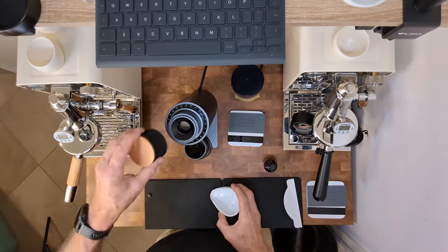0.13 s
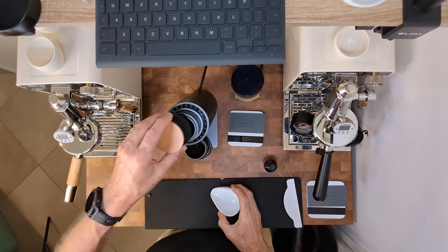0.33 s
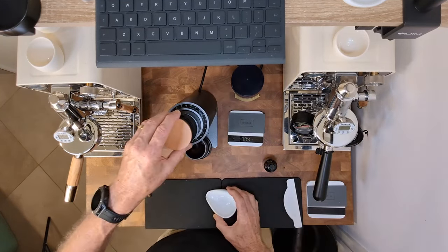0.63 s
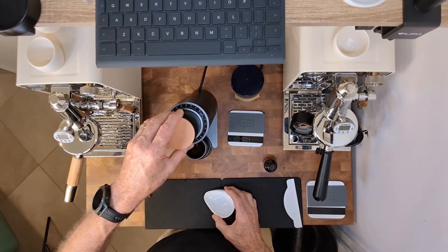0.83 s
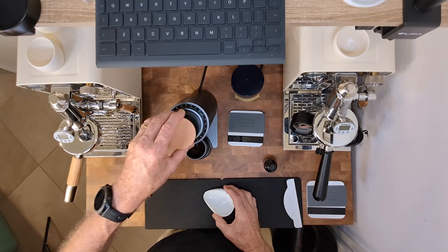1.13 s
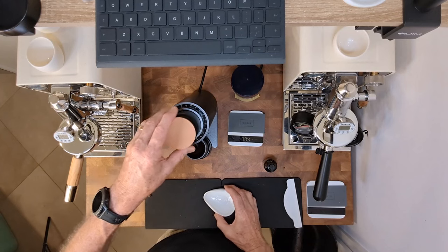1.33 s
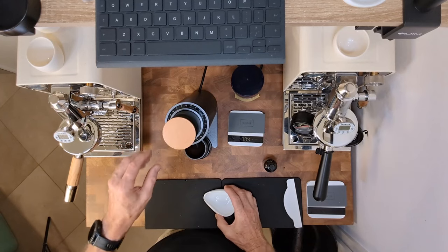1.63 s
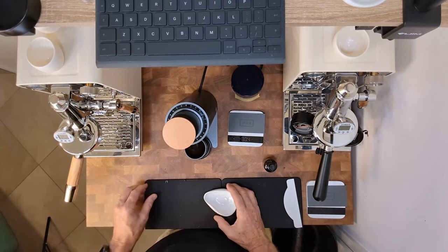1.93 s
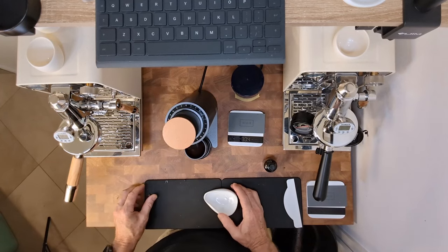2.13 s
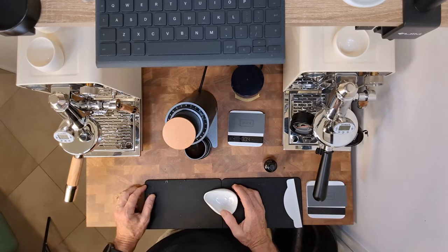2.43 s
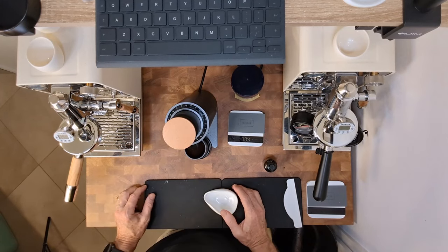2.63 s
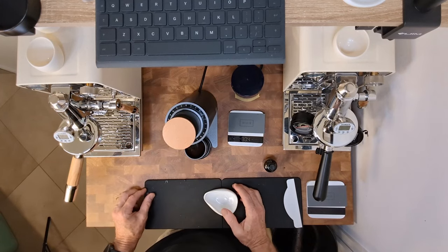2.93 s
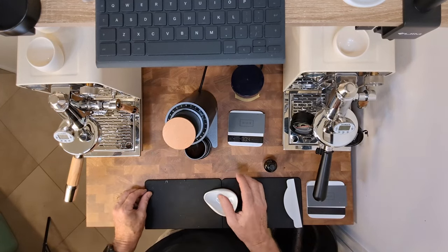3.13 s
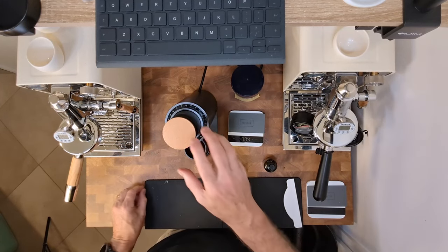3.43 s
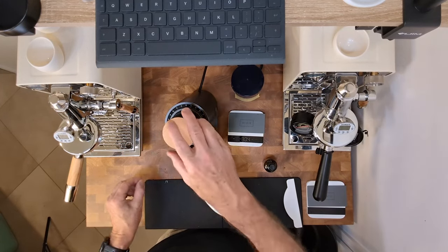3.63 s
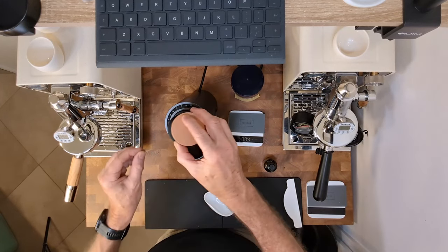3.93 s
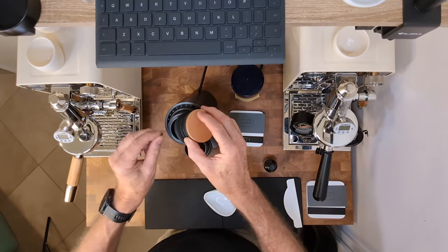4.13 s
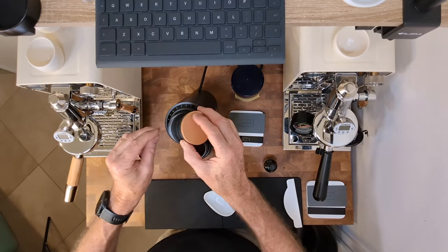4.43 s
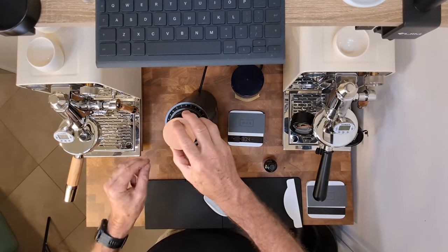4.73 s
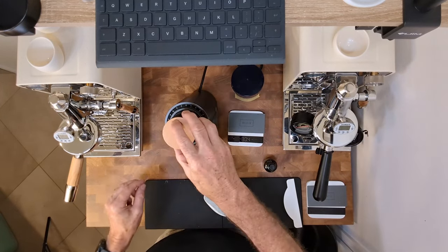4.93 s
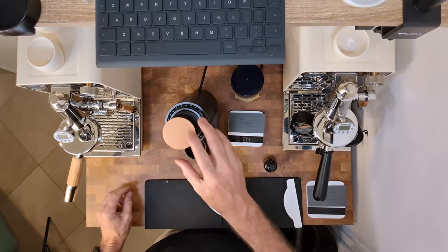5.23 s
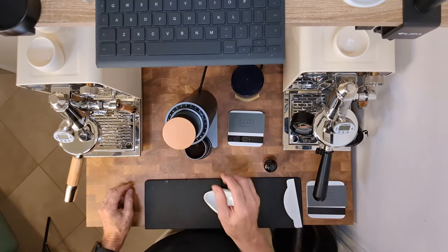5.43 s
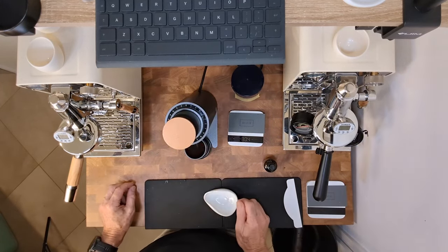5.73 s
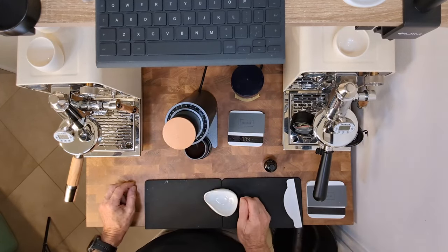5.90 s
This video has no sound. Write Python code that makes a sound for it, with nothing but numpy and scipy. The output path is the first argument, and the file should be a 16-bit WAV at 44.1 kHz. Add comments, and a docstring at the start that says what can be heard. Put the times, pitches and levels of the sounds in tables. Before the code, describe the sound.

Close microphone on a burr grinder crushing roasted beans on a counter, with short room reflections. Continuous rough grinding and a jolting mid-pitched whine run throughout, dipping as beans catch and crack. The open hopper rings hollow with spraying fragments at the start, is covered, then opens again about two thirds through with a tiny high ping before closing. The grinding carries on unbroken to the end.

```python
"""A whining motor and rasping burrs are heard at once: an electric grinder chews roasted beans, close by.
Its hopper starts half open; a hand sets the lid on, later lifts it and puts it back.
While it is open, ringing air and spraying fragments make the grinding hollower and brighter.
Each bean the burrs catch cracks, rings the chamber and drags down the whine of the gears.
Random tiny breaks shake the housing, a motor hums low down, and one thin ping rings near the end."""
import sys
import numpy as np
from scipy import signal
from scipy.fft import rfft, irfft
from scipy.io import wavfile

SR = 44100
rng = np.random.default_rng(int(sys.argv[2]) if len(sys.argv) > 2 else 0)


def store_pcm(level_fs):
    """Save levels as 16-bit WAV."""
    pcm = np.round(np.clip(level_fs, -1, 1) * 32767).astype(np.int16)
    wavfile.write(sys.argv[1], SR, np.atleast_2d(pcm).T)


N = 267510
TIME = np.arange(N) / SR


def amp(db):
    """Turns decibels into a gain."""
    return 10 ** (np.asarray(db) / 20)


def unit(x):
    """Scales a sound to an rms (average strength) of 1."""
    return x / np.sqrt(np.mean(x ** 2) + 1e-20)


def curves(rows):
    """Draws straight lines between the rows of a time table, one curve for each column after the time."""
    seconds, *columns = np.transpose(rows)
    return [np.interp(TIME, seconds, column) for column in columns]


def add(mix, s, sound):
    """Mixes a sound in at s seconds."""
    part = mix[max(round(s * SR), 0):][:len(sound)]
    part += sound[:len(part)]


def wander(rate_hz):
    """A smooth random curve of rms 1; changes faster than the rate fade away."""
    hz = np.fft.rfftfreq(N, 1 / SR)
    spectrum = rfft(rng.standard_normal(N))
    return unit(irfft(spectrum * np.exp(-(hz / rate_hz) ** 2), N))


def colour(x, spectrum, modes=(), size=8192):
    """Filters a sound by a smooth spectrum with resonances on top, never sounding before its input."""
    hz = abs(np.fft.fftfreq(size, 1 / SR))
    points_hz, points_db = np.transpose(spectrum)
    db = np.interp(np.log(hz + 1), np.log(points_hz), points_db)
    for centre, width, lift in modes:
        db = db + lift / (1 + (2 * (hz - centre) / width) ** 2)
    # minimum phase: the filter answers as early as it can
    log_response = np.conj(signal.hilbert(np.log(amp(db))))
    response = np.fft.ifft(np.exp(log_response)).real
    return signal.oaconvolve(x, response[:size // 2])[:N]


def resonate(x, hz, width):
    """A resonance, width in Hz, whose pitch follows the curve hz."""
    turn = np.exp(2j * np.pi * np.cumsum(hz) / SR)
    r = np.exp(-np.pi * width / SR)
    # shift the pitch down to zero, smooth, then shift back up
    return 2 * (turn * signal.lfilter([1 - r], [1, -r], x / turn)).real


def fractures(per_s, spread_db, clump_db, clump_hz):
    """Countless tiny breaks of uneven size, bunched as fragments enter the burrs."""
    size = amp(spread_db * np.minimum(rng.exponential(1, N), 4)) * rng.choice([-1, 1], N)
    happens = rng.random(N) < per_s / SR
    return unit(size * happens * amp(clump_db * wander(clump_hz)))


def kitchen(x, wet_db, t60):
    """The counter and walls add scattered echoes that fade by 60 dB in t60 seconds."""
    t = TIME[:SR // 2]
    taps = rng.standard_normal(len(t)) * (rng.random(len(t)) < .05) * (t > .003)
    tail = taps * np.exp(-np.log(1000) * t / t60)
    return x + amp(wet_db) * signal.oaconvolve(x, tail / np.linalg.norm(tail))[:N]


# A tiny bright ping. Its one row: start in seconds, pitch in Hz, level in dB, seconds to fade by 60 dB.
PING_NOTE = (4.345, 13124, -39, .22)


def ping():
    """A thin high ring that fades away evenly in dB."""
    s, hz, db, t60 = PING_NOTE
    t = np.maximum(TIME - s, 0)  # the sine stays at zero until the start
    return amp(db) * np.exp(-np.log(1000) * t / t60) * np.sin(2 * np.pi * hz * t)


# The lid comes on, is lifted and comes on again. Each row: time in seconds, hopper opening from 0 to 1.
LID_OPENING = [(0, .5), (.38, .62), (.66, .25), (.85, 0), (3.86, 0), (3.94, .4), (4.2, .8), (4.45, 1),
               (4.66, .3), (4.8, 0)]


def lid():
    """How far the hopper stands open: 0 is shut, 1 is wide open."""
    return np.clip(curves(LID_OPENING)[0], 0, 1)


# Drifts as the beans run down. The hollow ring is strongest about a third open, and lower when wider.
HOLLOW_HZ, HOLLOW_FALL_HZ_PER_S, HOLLOW_OPEN_HZ = 1066, 22.2, -110
HOLLOW_DB, HOLLOW_OPEN_DB = -16.5, -12
BRIGHT_HZ, BRIGHT_RISE_HZ_PER_S, BRIGHT_DB, BRIGHT_FALL_DB_PER_S = 4880, 200, -36, 2
# The colour of the spraying fragments. Each row: frequency in Hz, relative level in dB.
SPRAY_COLOUR = [(1500, -43), (4000, 19), (5500, -18), (6800, -10), (8000, -20), (9100, -9.5), (11000, -3),
                (12700, -9), (14000, -6), (15700, -10)]


def hopper(opening):
    """With the lid off, the air in the hopper rings and the spray of fragments is heard directly."""
    hollow_hz = HOLLOW_HZ - HOLLOW_FALL_HZ_PER_S * TIME + HOLLOW_OPEN_HZ * opening
    bright_hz = BRIGHT_HZ + BRIGHT_RISE_HZ_PER_S * TIME
    hollow_db = HOLLOW_DB + HOLLOW_OPEN_DB * opening
    bright_db = BRIGHT_DB - BRIGHT_FALL_DB_PER_S * TIME
    air = fractures(per_s=16000, spread_db=1.8, clump_db=2.1, clump_hz=45)
    hollow = resonate(resonate(air, hollow_hz, width=350), hollow_hz, width=330)
    bright = resonate(resonate(air, bright_hz, width=750), bright_hz, width=750)
    spray = colour(fractures(per_s=21000, spread_db=1.5, clump_db=2.0, clump_hz=35), SPRAY_COLOUR)
    # the rim sizzles even through the last narrow gap; the spray needs a wide one
    rim_hz = 7950 + 550 * np.sqrt(opening)
    rim = resonate(resonate(air, rim_hz, width=820), rim_hz, width=820)
    resonances = np.sqrt(opening) * (amp(hollow_db) * unit(hollow) + amp(bright_db) * unit(bright))
    rim = amp(-48.5) * opening ** 0.1 * unit(rim)
    spray = amp(-38.5) * opening ** 0.91 * unit(spray)
    return resonances + rim + spray


def ringing(level_db, hz, width):
    """One part of the grinder, kept ringing by a stream of tiny blows from breaking beans."""
    centre = np.full(N, hz)
    blows = fractures(per_s=3000, spread_db=2.0, clump_db=3.8, clump_hz=50)
    ring = unit(resonate(resonate(blows, centre, width), centre, width))
    # friction damps the widest swings, so the ring is more even
    ring = ring / np.hypot(1, abs(signal.hilbert(ring)))
    return amp(level_db) * unit(ring)


FUNNEL_OPEN_DB = 12.5  # added when the lid is fully off
# Beans rattling against the funnel wall. Each row: time in seconds, level in dB with the lid on.
FUNNEL_RATTLE = [(0, -39), (1.0, -35), (1.8, -30), (2.4, -37.5), (3.2, -32.5), (3.6, -39), (6.07, -41)]


def funnel(opening):
    """The funnel wall rings under the rattling beans, and is louder the wider the hopper is open."""
    level_db = curves(FUNNEL_RATTLE)[0] + FUNNEL_OPEN_DB * opening
    return ringing(level_db, hz=1682.0, width=97)


BITE_SAG_HZ = 42.07  # pitch drop under a full load
# The drive's pace, set by how full the burrs are.
# Each row: time in seconds, whine pitch in Hz before caught beans drag it down.
DRIVE_PACE = [(0.0, 1221), (0.41, 1254), (0.67, 1296), (1.23, 1263), (1.53, 1189), (1.77, 1272),
              (2.34, 1244), (2.82, 1265), (2.86, 1255), (3.55, 1225), (3.88, 1311), (4.01, 1241),
              (4.61, 1236), (4.74, 1198), (5.19, 1287), (5.54, 1241), (5.77, 1287), (6.07, 1230)]


def drive_pitch(bite):
    """The whine's pitch in Hz: each caught bean loads the burrs and slows the drive for a moment."""
    return curves(DRIVE_PACE)[0] - BITE_SAG_HZ * bite


USUAL_HZ = 1286  # drive pitch from which lower, labouring pitches are counted
OCTAVE_DB, OCTAVE_DB_PER_HZ = -34.5, -0.0042  # the whine's octave is slightly louder at lower pitch
HUM_HZ, HUM_DB, HUM_OCTAVE_DB = 100.7, 1.5, 3  # the two dB values are added to the hum table
# The gear whine, mostly louder while the lid is open. Each row: time in seconds, level in dB.
WHINE_LEVEL = [(0, -19.5), (.1, -22), (.22, -26), (.42, -22.5), (.55, -22.5), (.72, -29.5), (1.0, -33.5),
               (1.6, -28), (1.85, -27), (3.3, -27.5), (3.53, -28.5), (3.88, -34), (4.0, -23.5),
               (4.3, -27.5), (4.6, -24.5), (5.05, -33), (5.22, -29), (6.07, -29.5)]
# The motor's hum. Each row: time in seconds, low tone in dB, its octave in dB, both before the boost.
HUM_LEVELS = [(0.0, -61, -52), (0.64, -65, -56.5), (1.01, -57.5, -48), (1.54, -64, -70), (1.82, -52, -53.5),
              (2.18, -74, -59.5), (2.28, -54, -58), (2.99, -69, -60.5), (3.06, -55, -54), (3.36, -62, -59),
              (3.56, -53, -61), (3.73, -67, -57), (3.94, -50, -58), (3.95, -53, -73), (4.04, -65, -53),
              (4.36, -60, -65), (4.76, -59, -55), (6.07, -63, -62)]
# How the gearbox passes the whine to the housing. Each row: frequency in Hz, relative level in dB.
GEARBOX_COLOUR = [(1000, -4.5), (1220, -3), (1300, 3.5), (1390, -7.5), (2300, -14), (2450, -7), (2700, -1)]
# Resonances of the housing, also heard in the burrs.
# Each row: centre in Hz, width in Hz, lift in dB (a minus is a dip).
HOUSING_MODES = [(374, 38, 8.5), (630.7, 27.3, 9), (718, 60, 5.5), (887, 30, 11), (921, 23, 3),
                 (1050, 43, 6), (1205, 55, 2), (1522, 42, 10), (1769, 117, 8), (1960, 22, 6.5),
                 (2153, 51, 5.5), (2441, 40, 6), (2976, 8.3, -5), (3276, 23, 10.5), (3385, 48, 7.5),
                 (3480, 82, 3.5), (4379, 60, 9.5), (4430, 76, 4), (6680, 110, 5), (7300, 360, 7.5),
                 (8470, 130, 12), (9690, 114, 14)]


def motor(hz):
    """Gear teeth mesh at a jolting pitch and flare as they cross the housing's resonances; a motor hums."""
    first_db, = curves(WHINE_LEVEL)
    second_db = OCTAVE_DB + OCTAVE_DB_PER_HZ * (hz - USUAL_HZ) + 2.4 * wander(rate_hz=5.1)
    jolting_hz = hz * (1 + 0.00918 * wander(rate_hz=40.4))
    mesh = 2 * np.pi * np.cumsum(jolting_hz) / SR
    mesh = mesh + 0.25 * wander(rate_hz=137)  # backlash between the teeth
    first = kitchen(amp(3.2 * wander(rate_hz=65)) * np.sin(mesh), wet_db=-12, t60=0.1)
    second = kitchen(amp(0.71 * wander(rate_hz=54)) * np.sin(2 * mesh), wet_db=-3, t60=0.36)
    first = amp(first_db) * unit(colour(first, GEARBOX_COLOUR, HOUSING_MODES))
    second = amp(second_db) * unit(colour(second, GEARBOX_COLOUR, HOUSING_MODES))
    phase = 2 * np.pi * np.cumsum(HUM_HZ + 3.66 * wander(rate_hz=13.3)) / SR
    low_db, octave_db = curves(HUM_LEVELS)
    low = amp(low_db + HUM_DB) * np.sin(phase)
    octave = amp(octave_db + HUM_OCTAVE_DB) * np.sin(2 * phase)
    return first + second + (low + octave) * amp(3 * wander(rate_hz=18))


CHAMBER_DB, CHAMBER_BITE_DB, CHAMBER_DB_PER_HZ, CHAMBER_FALL_DB_PER_S = -27, 4.5, .03, .4


def chamber(hz, bite):
    """The burr chamber rings louder in a bite or when the drive labours, and less as the beans run down."""
    level_db = CHAMBER_DB + CHAMBER_BITE_DB * bite + CHAMBER_DB_PER_HZ * (USUAL_HZ - hz)
    level_db = level_db + 3.14 * wander(rate_hz=26) - CHAMBER_FALL_DB_PER_S * TIME
    return ringing(level_db, hz=1149.7, width=69)


CRUSH_DB, CRUSH_BITE_DB = 2.5, 1  # added to the feed, and added by a full bite
MILL_DB, MILL_BITE_DB, MILL_DB_PER_HZ, MILL_RISE_DB_PER_S = -27, 1.5, 0.0019, 0.0843
# The feed of coarse pieces being crushed. Each row: time in seconds, level in dB before CRUSH_DB is added.
COARSE_FEED = [(0.0, -30), (1.35, -31), (1.39, -28.5), (1.57, -33.5), (1.65, -27), (2.04, -32),
               (2.41, -28.5), (2.43, -32.5), (2.69, -30), (2.94, -32.5), (3.88, -30), (3.97, -28.5),
               (5.66, -32), (5.76, -26.5), (5.81, -33.5), (6.07, -27)]
# The colour of coarse crushing. Each row: frequency in Hz, relative level in dB.
CRUSH_COLOUR = [(25, -66), (55, -33.5), (95, -26.5), (160, -24), (230, -21), (300, -33.5), (440, -22.5),
                (590, -3), (800, -5), (1000, -8), (1250, -2), (1400, -34.5), (3000, -65)]
# The colour of fine milling. Each row: frequency in Hz, relative level in dB.
MILL_COLOUR = [(400, -39), (1000, 2), (1250, 2.5), (1400, -2.5), (1600, -1.5), (2200, 0.5), (2650, 1),
               (3800, -3), (4800, -8.5), (6200, -16.5), (7500, -22.5), (8800, -29.5), (11000, -29.5),
               (12200, -41), (14000, -39), (15700, -48)]


def burrs(hz, bite):
    """Coarse pieces thud through the housing; fine ones rasp, slightly more as the drive labours."""
    crush_db = curves(COARSE_FEED)[0] + CRUSH_DB + CRUSH_BITE_DB * bite + 0.71 * wander(rate_hz=6.5)
    mill_db = MILL_DB + MILL_BITE_DB * bite + MILL_DB_PER_HZ * (USUAL_HZ - hz) + MILL_RISE_DB_PER_S * TIME
    coarse = fractures(per_s=8000, spread_db=2.5, clump_db=1.63, clump_hz=49.5)
    coarse = colour(coarse, CRUSH_COLOUR, HOUSING_MODES)
    fine = fractures(per_s=12000, spread_db=1.65, clump_db=1.0, clump_hz=110)
    fine = kitchen(colour(fine, MILL_COLOUR, HOUSING_MODES), wet_db=-9.5, t60=0.057)
    return amp(crush_db) * unit(coarse) + amp(mill_db) * unit(fine)


BITE_LAG_S, BITE_WIDTH_S = 0.017, .04
# Whole beans caught and cracked; they also load the burrs.
# Each row: start in seconds, knock level in dB, ring in Hz, load on the burrs (about 1 for a hard bean).
BEAN_CRACKS = [(.09, -18, 1180, 1), (.433, -12, 1110, .7), (.460, -13, 1090, .5), (.507, -4.5, 1064, .5),
               (.615, -6.5, 1086, .3), (.630, -9.5, 1100, .2), (.927, -15, 1130, .7),
               (1.060, -15.5, 1160, .4), (1.352, -16, 1145, 1.2), (1.48, -18, 1150, .6),
               (1.625, -14, 1115, .8), (1.87, -20, 1150, 1.2), (2.009, -16, 1115, .7),
               (2.711, -16, 1152, .9), (3.065, -18, 1140, .6), (3.433, -17, 1143, .8),
               (3.48, -20, 1150, .6), (3.906, -16, 1020, .3), (4.186, -15, 1200, .3), (4.45, -14, 1000, .2),
               (4.54, -15, 1034, .4), (4.607, -15, 1084, .6), (5.023, -14, 1150, .7), (5.114, -16, 1150, 1),
               (5.45, -21, 1150, .5), (5.71, -20, 1130, .6), (5.879, -17, 1156, 1.4)]


def cracks():
    """A bean gives way: a quick snap, and a knock that swells and dies in the burr chamber."""
    out, t = np.zeros(N), TIME[:SR // 12]
    u = t / .003  # the knock is strongest after 3 ms
    swell = u * np.exp(1 - u)
    band = signal.butter(2, [900, 3000], "band", fs=SR)
    noises = rng.standard_normal((len(BEAN_CRACKS), len(t)))
    for (s, db, hz, _), noise in zip(BEAN_CRACKS, noises):
        knock = swell * (np.sin(2 * np.pi * hz * t) + 0.083 * np.sin(2 * np.pi * 640 * t))
        snap = signal.lfilter(*band, noise) * np.exp(-t / 0.0032)
        add(out, s, amp(db) * (knock + 0.39 * snap))
    return kitchen(out, wet_db=-14, t60=.15)


def bites():
    """Load on the burrs, 0 to 1: a short swell just after each bean starts to crack."""
    load_sum = np.zeros(N)
    for s, _, _, load in BEAN_CRACKS:
        load_sum += load * np.exp(-((TIME - s - BITE_LAG_S) / BITE_WIDTH_S) ** 2)
    return np.tanh(load_sum)


def scene():
    """Adds up the grinder's parts: the beans' load and the lid's opening shape what is heard."""
    bite, opening = bites(), lid()
    hz = drive_pitch(bite)
    background = ping() + hopper(opening) + funnel(opening) + motor(hz)
    grinding = chamber(hz, bite) + burrs(hz, bite) + cracks()
    return (background + grinding)[None]


EDGE_HZ = 15720


def record(dry):
    """A steep low-pass filter removes the sound above the edge frequency."""
    low_pass = signal.firwin(1023, EDGE_HZ, window=("kaiser", 9), fs=SR)
    return signal.oaconvolve(dry, low_pass[None], "same")


dry = scene()
out = record(dry)
store_pcm(out)
```